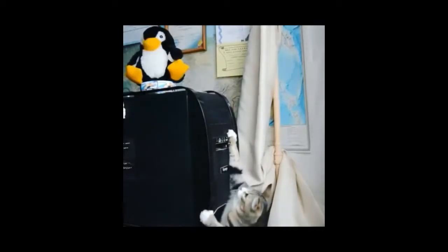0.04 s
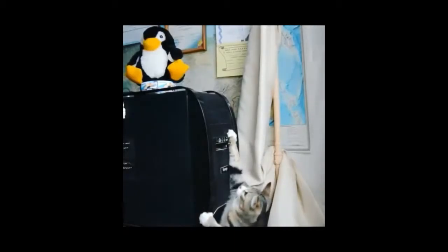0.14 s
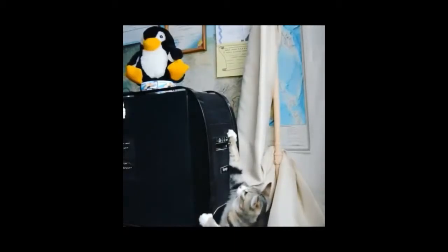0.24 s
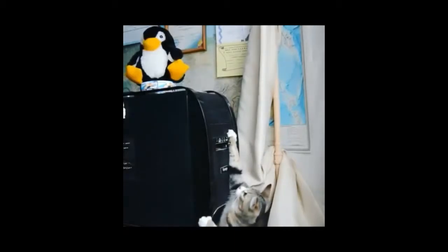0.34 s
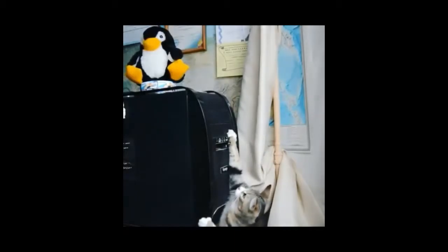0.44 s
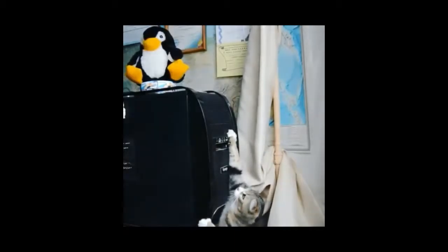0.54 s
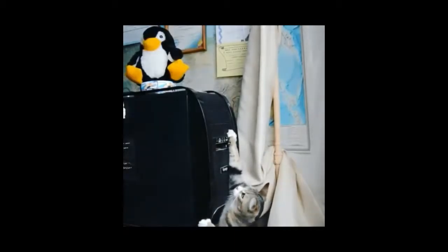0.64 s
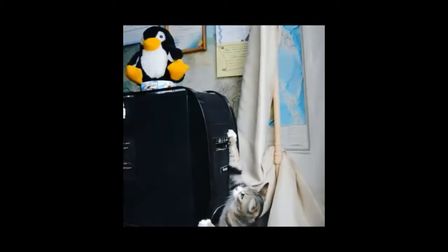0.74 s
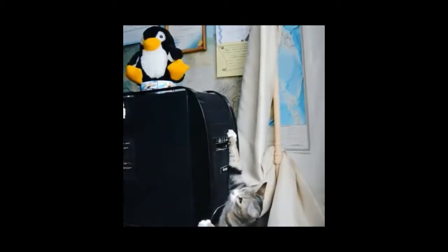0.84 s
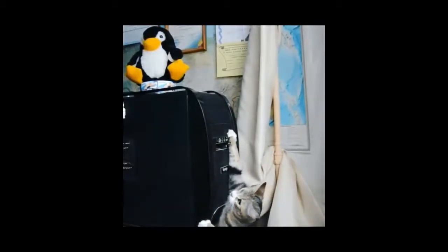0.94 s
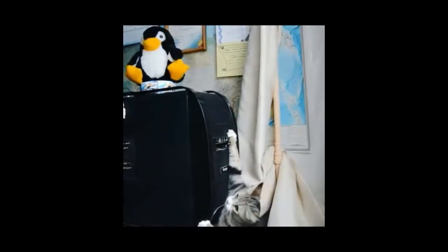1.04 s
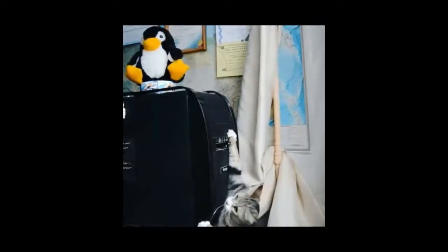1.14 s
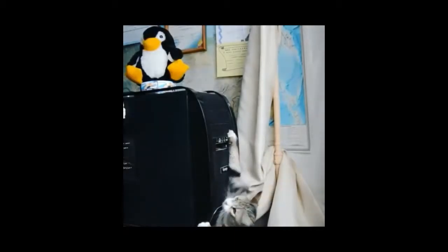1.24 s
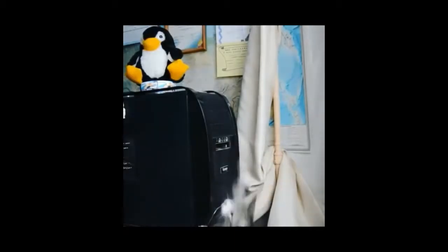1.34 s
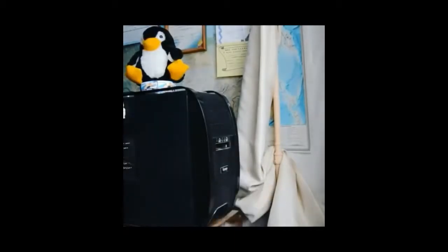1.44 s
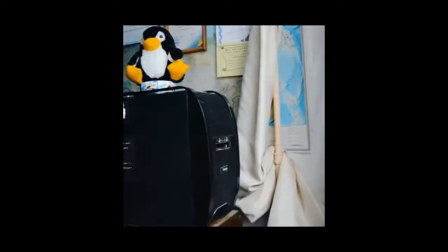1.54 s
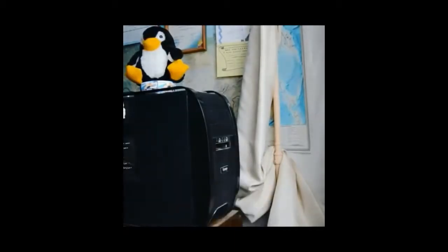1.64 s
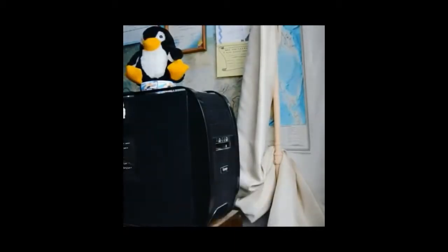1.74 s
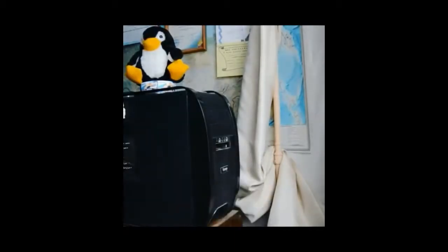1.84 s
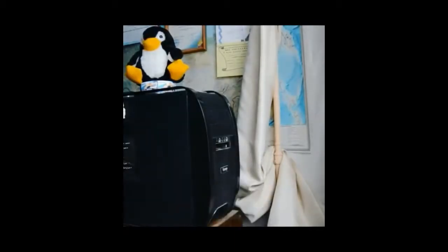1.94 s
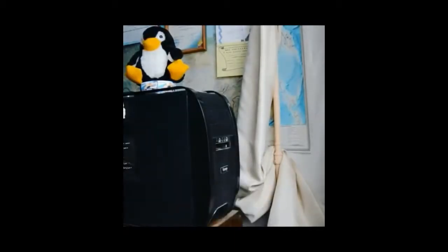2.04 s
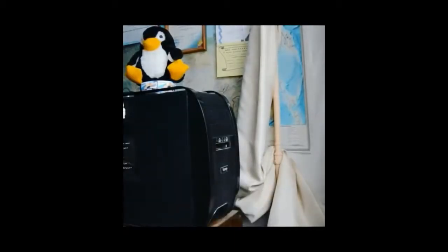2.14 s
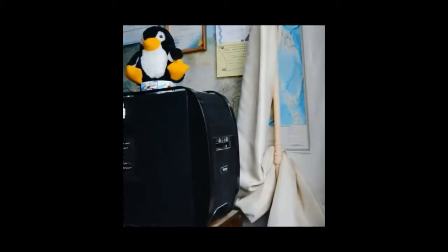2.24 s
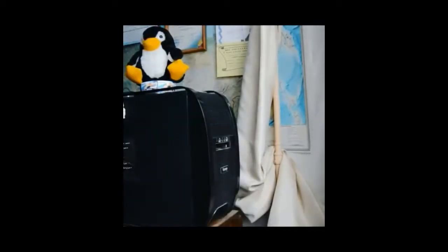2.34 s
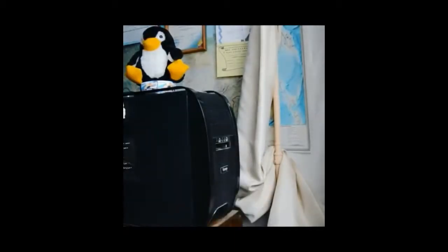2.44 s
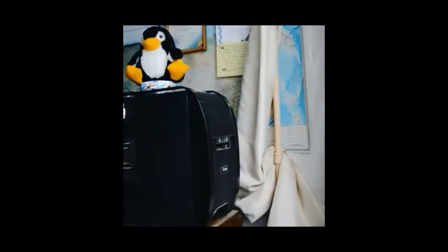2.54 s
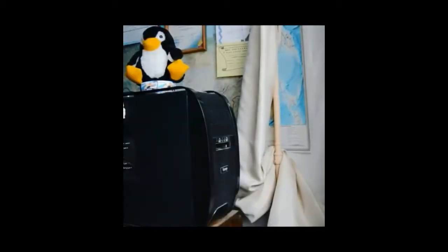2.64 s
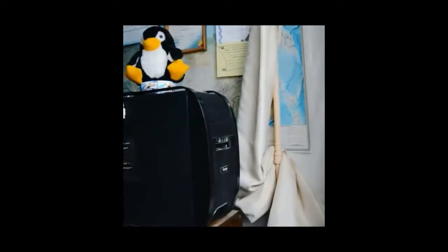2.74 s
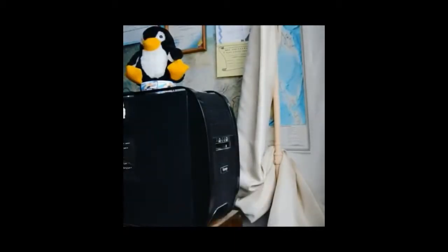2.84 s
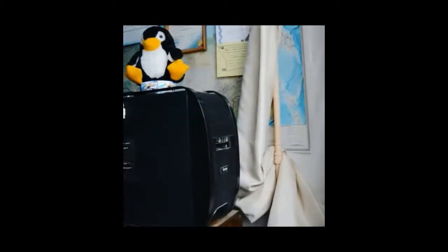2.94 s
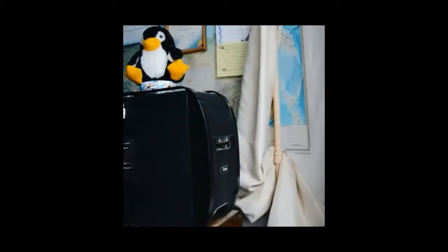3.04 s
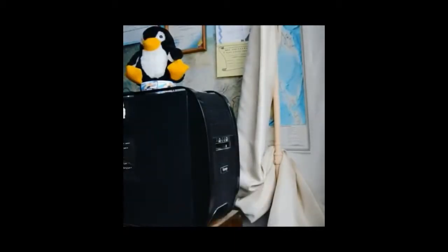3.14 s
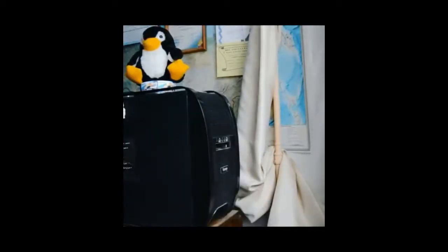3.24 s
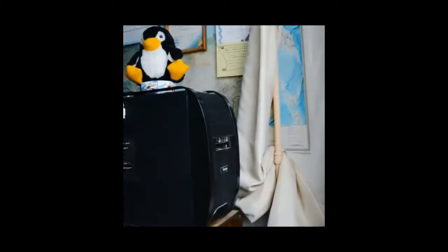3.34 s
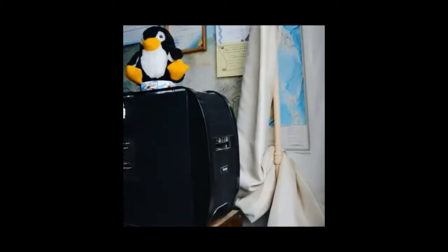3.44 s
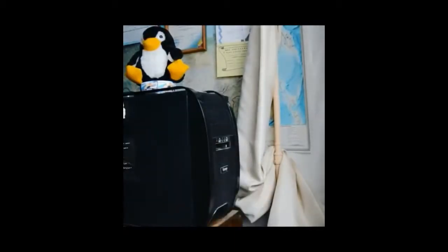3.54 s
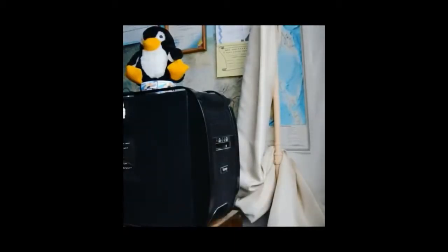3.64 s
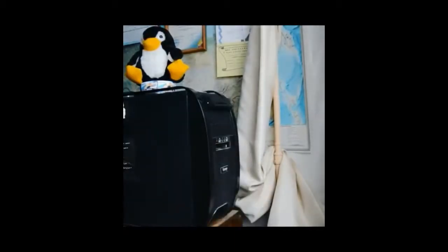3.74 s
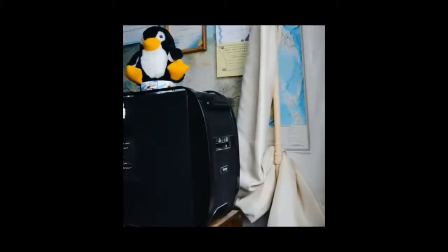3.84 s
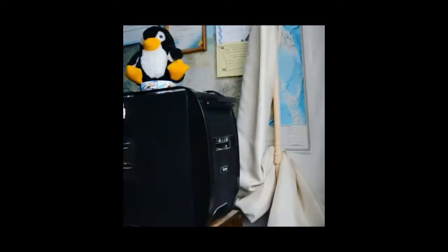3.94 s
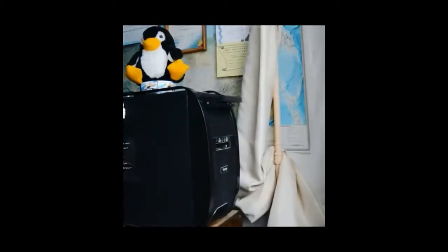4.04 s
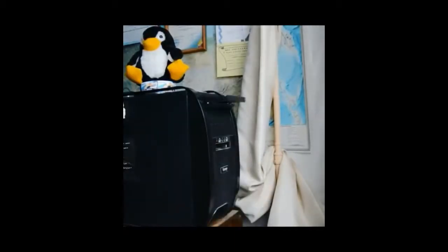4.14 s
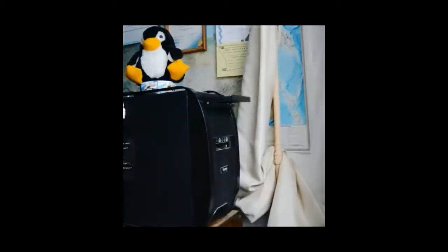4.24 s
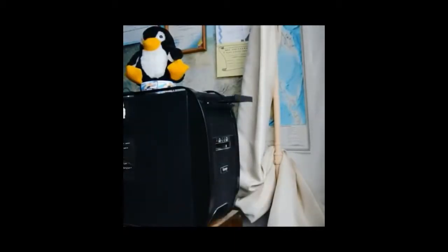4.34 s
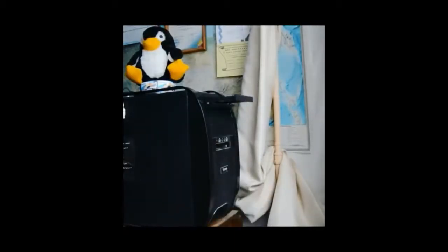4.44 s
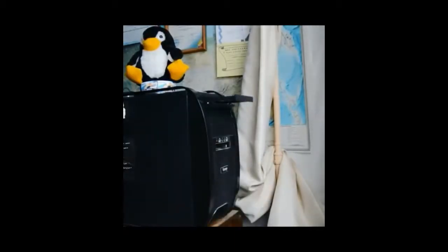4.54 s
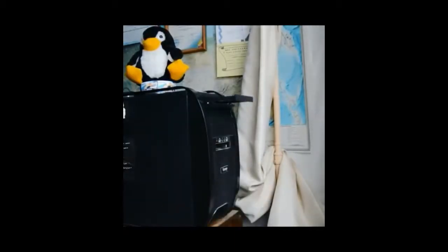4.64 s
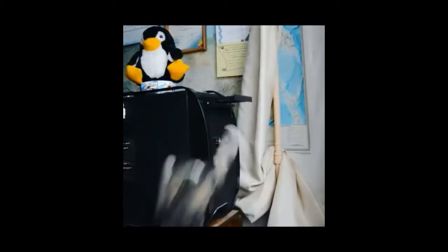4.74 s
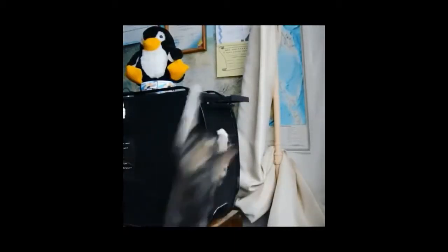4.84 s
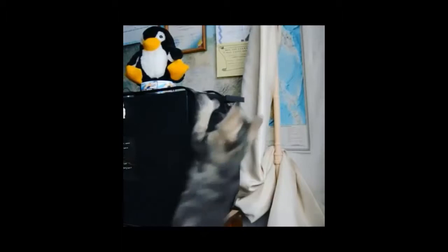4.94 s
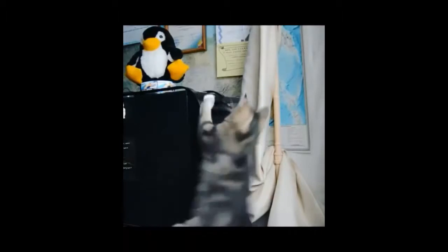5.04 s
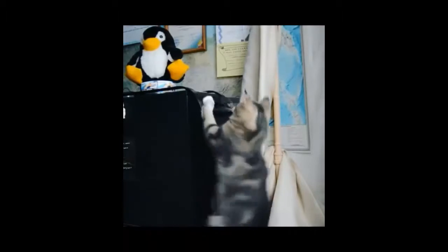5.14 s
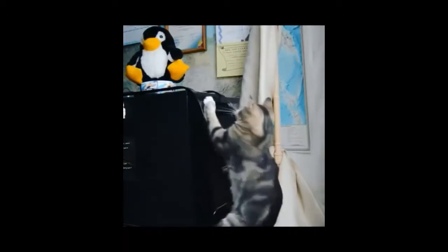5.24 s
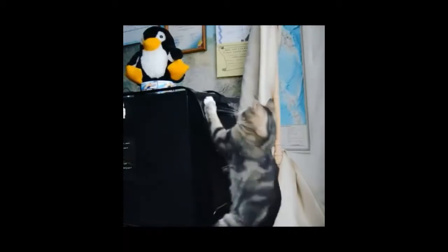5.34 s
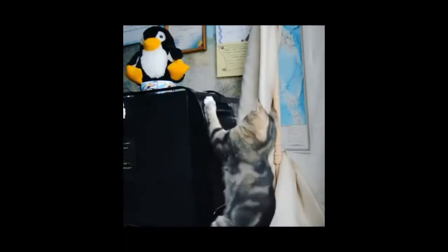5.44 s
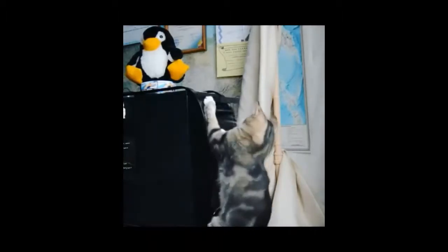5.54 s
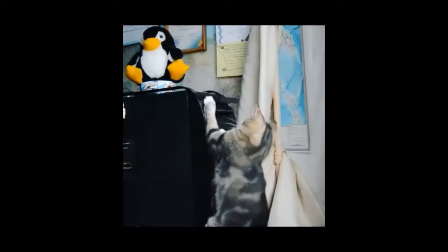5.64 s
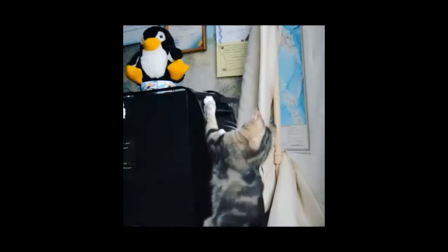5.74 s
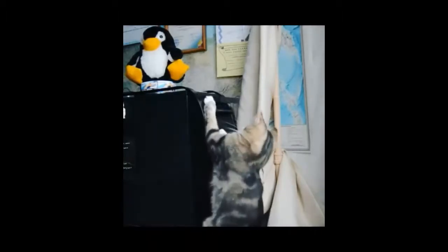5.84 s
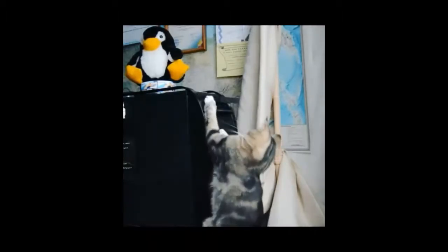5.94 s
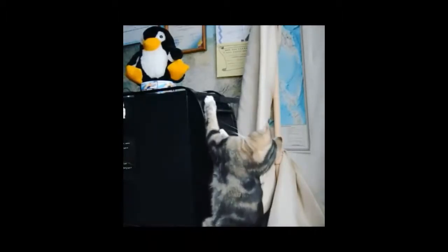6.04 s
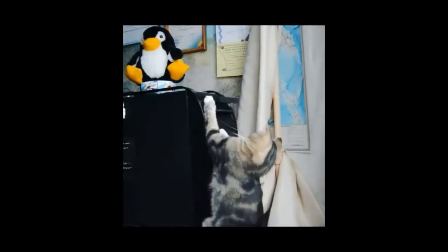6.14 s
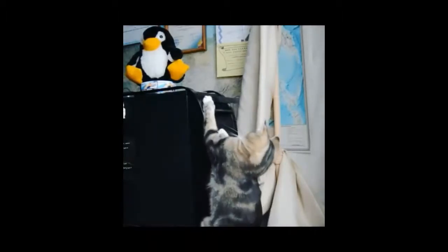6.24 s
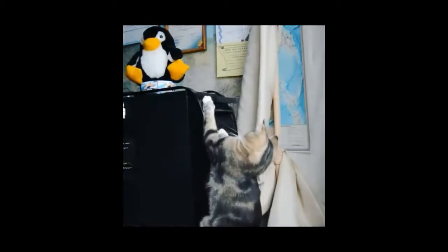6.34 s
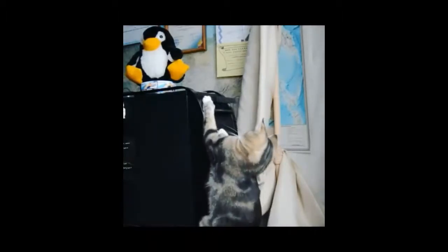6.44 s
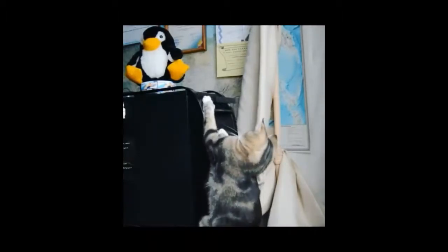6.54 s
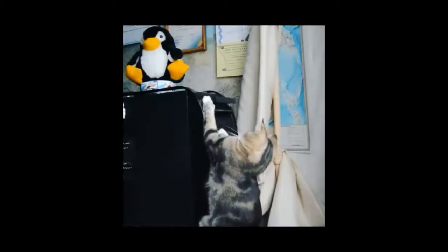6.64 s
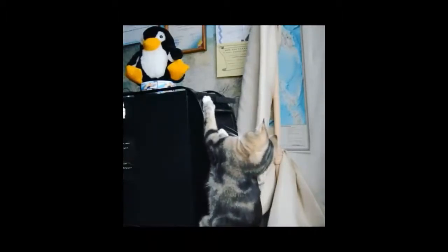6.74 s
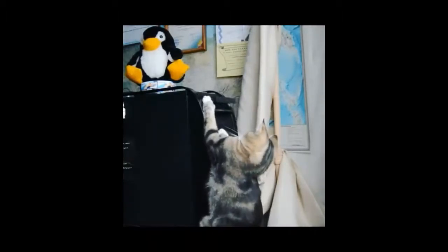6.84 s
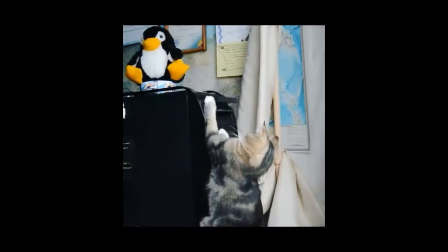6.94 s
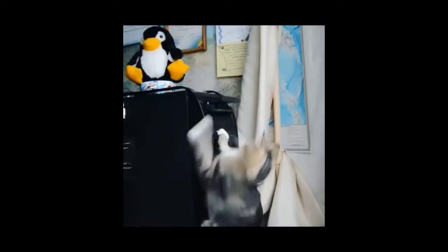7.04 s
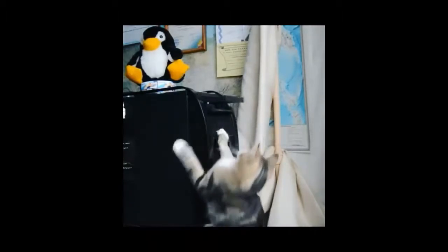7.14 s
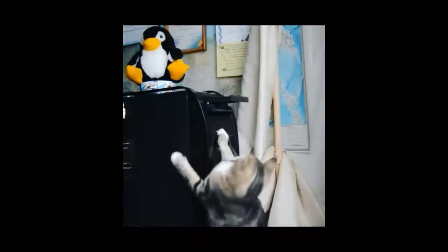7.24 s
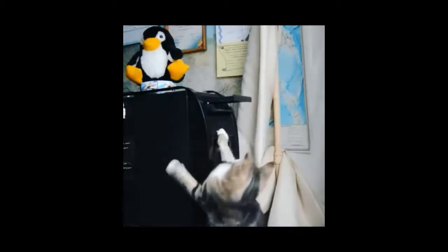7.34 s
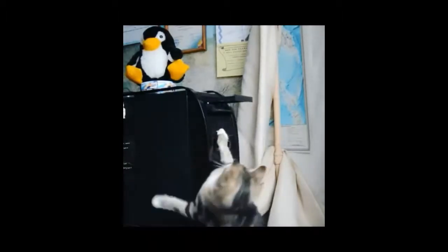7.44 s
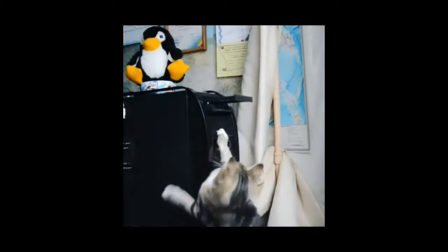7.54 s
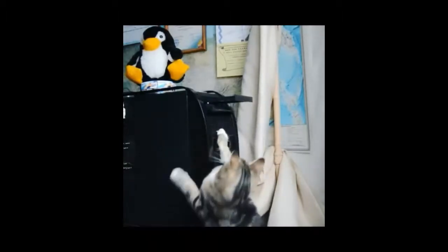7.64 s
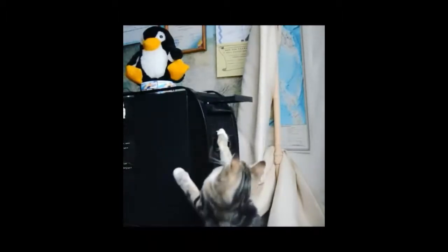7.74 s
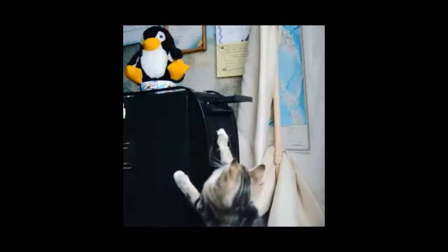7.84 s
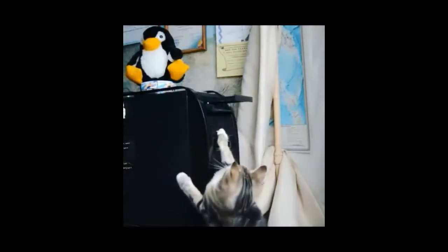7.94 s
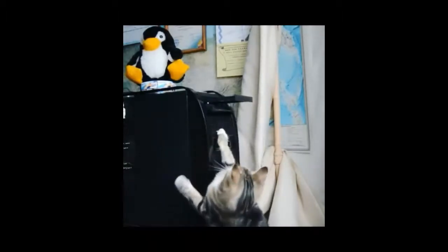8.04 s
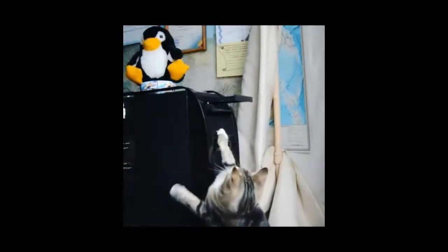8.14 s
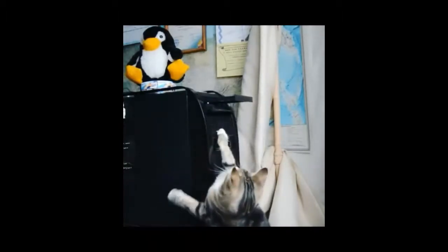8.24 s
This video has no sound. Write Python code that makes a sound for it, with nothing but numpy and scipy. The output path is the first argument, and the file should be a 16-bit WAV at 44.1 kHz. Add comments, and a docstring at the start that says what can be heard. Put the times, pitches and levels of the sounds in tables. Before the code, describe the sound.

A small microphone sits close to a computer case in a small furnished room; quiet fan air and faint wavering tones continue throughout. Soft brushing opens the scene, with one clear paw knock at 0.6 s. From 1.2 to 1.7 s the cat lets go and drops: quick clacks, scratchy rubs, the sharpest knock near 1.4, and a low thump near 1.6 bending upward, with the desk humming briefly. Boomy soft bumps follow at 2.2-2.6, then brushing and modest knocks at 3.4-4.0. Around 4.1-4.3 a faint, fuzzy tray-motor whine swells, sags in pitch and stops. The leap at 4.8-5.3 is loudest: hard claw strikes, scraping and hollow clatter, strongest at 4.9 and 5.2. A solid thud lands at 6.0, with soft bumps around it. Light knocks and a rub come at 7.1, then faint taps over the fans until about 8.3.

```python
"""In a small furnished room, a cat paws and claws at a computer case and leaps at the disc tray as it slides out.
Fans hum quietly throughout: filtered noise plus narrow-band tones. Fur, pads and tray brush along the case
as dense stick-slip clicks; paws and claws strike it as short bursts of slips that excite its modes.
Heavy landings leave two desk modes beating, the cat's weight thumps with a rising pitch,
and the tray's motor is narrow-band noise that swells, sags in pitch and fades."""
import sys
import numpy as np
from scipy import signal
from scipy.io import wavfile
from scipy.ndimage import uniform_filter1d

SR = 44100
rng = np.random.default_rng(int(sys.argv[2]) if len(sys.argv) > 2 else 0)


def materialize(psi):
    """Save the field psi as 16-bit PCM at rate SR to the path in sys.argv[1].

    A 1-D psi becomes a single channel; in a 2-D psi each row is a channel.
    """
    bounded = np.clip(np.atleast_2d(psi).T, -1, 1)
    quanta = np.round(bounded * 32767).astype(np.int16)
    wavfile.write(sys.argv[1], SR, quanta)


N = 366030


def gain_of(db):
    """Level definition: amplitude ratio for a level in dB."""
    return 10 ** (np.asarray(db) / 20)


def evened(x):
    """Normalisation: scales a signal to unit root-mean-square."""
    return x / np.sqrt(np.mean(x ** 2) + 1e-20)


def read(points, hz):
    """Interpolation of a frequency table along a logarithmic frequency axis."""
    f, value = np.transpose(points)
    return np.interp(np.log(hz + 1), np.log(f + 1), value)


def add(mix, s, sound):
    """Superposition: adds a sound to the mix from time s, cut at the end."""
    part = mix[round(s * SR):][:len(sound)]
    part += sound[:len(part)]


def resonate(x, hz, width):
    """Heterodyne resonance of gain 1: shifts the curve hz down to zero, smooths, and shifts back."""
    turn = np.exp(2j * np.pi * np.cumsum(hz * np.ones(len(x))) / SR)
    r = np.exp(-np.pi * width / SR)
    smoothed = signal.lfilter([1 - r], [1, -r], x / turn + 1e-18)
    return 2 * (turn * smoothed).real


def coloured(x, points):
    """Minimum-phase filtering: a causal filter with the gain of an (f/Hz, level/dB) table."""
    level_db = read(points, abs(np.fft.fftfreq(8192, 1 / SR)))
    log_gain = np.log(gain_of(level_db))
    response = np.exp(np.conj(signal.hilbert(log_gain)))
    taps = np.fft.ifft(response).real[:4096]
    return signal.oaconvolve(x, taps)[:len(x)]


# fan air noise, relative spectrum as heard through the microphone: (f/Hz, level/dB per Hz)
FAN_AIR = [(15, -47.5), (25, -26.5), (49, -5), (109, -21.5), (146, -4), (231, -15.5), (271, 2), (394, -16),
           (438, -3.5), (573, -7), (1000, -4), (1120, -7), (1350, -9), (2500, -14.5), (15000, -40)]
# fan tones, before the microphone: (f/Hz, bandwidth/Hz, level/dB)
FAN_TONES = [(146.1, 13, -79), (266, 12, -80.5), (969.98, 20., -79), (1042.9, 11, -82), (1357.8, 13, -78.5),
             (1764.4, 12., -81.5)]
FAN_AIR_DB = -65.5  # overall level before the microphone


def fans():
    """Broadband flow noise with drifting patches, and narrow-band blade tones that waver."""
    frames, hz = N // 256 + 5, np.fft.rfftfreq(1024, 1 / SR)
    real, imaginary, patches = rng.standard_normal((frames, 513, 3)).T
    patches = uniform_filter1d(patches, 10, 0)  # smooth over frequency
    patches = evened(uniform_filter1d(patches, 12, 1))  # smooth over time
    # the microphone's colour is taken out here, as record() puts it in
    spectrum_db = read(FAN_AIR, hz) - read(MICROPHONE, hz)
    z = (real + 1j * imaginary) * gain_of(spectrum_db[:, None] + 1.9 * patches)
    air = signal.istft(z, nperseg=1024, noverlap=768)[1][:N]
    tones = sum(gain_of(db) * evened(resonate(rng.standard_normal(N), f, width))
                for f, width, db in FAN_TONES)
    return gain_of(FAN_AIR_DB) * evened(air) + tones


def slips(count, per_s, spread_db):
    """Stick-slip friction: random clicks of uneven size and random sign."""
    size = gain_of(spread_db * np.minimum(rng.exponential(1, count), 4))
    sign = rng.choice([-1., 1.], count)
    return size * sign * (rng.random(count) < per_s / SR)


# countless small modes and the room, decay times before contact damping: (f/Hz, t60/s)
DENSE_DECAY = [(80, .5), (210, .4), (560, 0.65), (1470, 0.29), (3880, 0.23), (10200, .19)]


def rattle(force, damping, spot_db, direct_db):
    """Statistical energy balance: bands of small modes store and lose the energy fed in; bare ticks on top."""
    f, frame_s, z = signal.stft(rng.standard_normal(len(force)), SR, nperseg=256, noverlap=192)
    frame_starts = 64 * np.arange(len(frame_s))
    fed = np.add.reduceat(np.pad(force, (0, 256)) ** 2, frame_starts)  # energy per frame
    age = frame_s[:280]
    t60 = damping * read(DENSE_DECAY, f)[:, None]
    dying = gain_of(-120 * age / t60)  # a power, hence 120 in place of 60
    dying = dying * (1 + 4.3 * np.exp(-age / 0.0016))  # stronger at the onset
    power = abs(signal.oaconvolve(fed[None], dying, axes=1)[:, :len(frame_s)])
    spot = evened(uniform_filter1d(rng.standard_normal(z.shape), size=24, axis=1))
    spot = gain_of(spot_db * spot)  # the favoured bands shift as the contact moves
    dense = signal.istft(z * spot * np.sqrt(power), SR, nperseg=256, noverlap=192)[1][:len(force)]
    return evened(dense) + gain_of(direct_db) * evened(force)


# strokes of fur, pads and the tray along the case, before the microphone:
# (t/s, swell/s, hold/s, time to die by 20 dB/s (sign ignored), level/dB,
#  weight level re rub/dB, rasp level re rub/dB)
STROKES = [(-.09, 0.18366, 0.0561, 0.2892, -59, -21, -2), (0.263, 0.01988, 0.039, 0.0523, -73.5, -17.5, -6),
           (0.379, 0.01027, 0.0904, -0.2038, -66, -16, -4),
           (0.962, 0.02309, 0.02715, 0.0867, -64.5, -26.5, -12),
           (1.248, 0.02358, 0.0962, -0.0783, -50, -14, -5.5), (1.418, 0.028, 0.00523, 0.0868, -38, -10, -6),
           (1.482, 0.09262, 0.00494, 0.1347, -40, -6.5, -4.5),
           (1.645, 0.03658, 0.00314, 0.2286, -54, -2.5, -7.5),
           (3.205, 0.02052, .005, 0.0081, -67, -19, -6.5), (3.404, 0.07749, .005, 0.2228, -44.5, -6, -7.5),
           (3.696, 0.05774, 0.00475, 0.3096, -51, -2.5, -8), (3.851, 0.04054, 0.0528, 0.125, -65, -2.5, -9),
           (4.069, 0.0956, 0.00585, 0.1469, -59.5, -13, -4),
           (4.349, 0.01364, 0.004444, -0.6356, -59.5, -8, -8),
           (4.833, 0.01397, 0.01332, -0.0897, -43, -3, -9), (4.987, 0.02274, 0.11178, 0.068, -45, 0, -11.5),
           (5.219, 0.0294, 0.005575, 0.0573, -37, -3, -1.5),
           (5.394, 0.01244, 0.00533, 0.3696, -55, -5, -5.5),
           (7.122, 0.05054, 0.00504, 0.2498, -47.5, -11, -7),
           (7.313, 0.0306, 0.0369, 0.026, -68.5, 1.5, -8.5),
           (7.405, 0.01205, 0.0055, -0.2195, -60.5, -4, -9.5), (7.959, 0.079, .005, -0.23, -70, -20, -10.5),
           (8.169, 0.0368, 0.005213, 0.0181, -64.5, -20.5, -12)]
SWELL_POWER = 1.3


def rubs():
    """Friction excitation: clumped slips shake the case; weight raises the low panel, rasp the treble."""
    clumps = evened(uniform_filter1d(rng.standard_normal(N), size=700))
    force = slips(N, per_s=3300.0, spread_db=3.) * gain_of(1.2 * clumps)
    body = rattle(force, 0.25, spot_db=5.0, direct_db=-8.5)
    low = coloured(body, [(60, -12.5), (200, -2), (600, 3.5), (1200, -20.5), (4000, -49.5)])
    middle = coloured(body, [(300, -34.5), (900, 3.5), (2500, 1.5), (6000, -13.5), (16000, -42.0)])
    high = coloured(body, [(1500, -27.5), (4500, 21.5), (16000, 7.0)])
    layers = np.array([evened(x) for x in (middle, low, high)])
    gains = np.zeros((N, 3))
    t = np.arange(N) / SR
    for start, swell, hold, dying, db, weight_db, rasp_db in STROKES:
        since = t[max(round(start * SR), 0):][:SR * 2 // 3] - start
        press = np.clip(since / swell, 0, 1) ** SWELL_POWER
        press = press * gain_of(-20 * np.maximum(since - swell - hold, 0) / abs(dying))
        layer_gains = gain_of(db + np.array([0, weight_db, rasp_db]))
        add(gains, max(start, 0), press[:, None] * layer_gains)
    return (layers * gains.T).sum(0)


# clear modes of the case, before random weighting, detuning and damping: (f/Hz, level/dB, t60/s)
CASE_MODES = [(112.58, 5, 0.35), (85, -6, 1), (167.16, -0.5, 0.38), (205.68, -2.5, 0.8), (235.56, 0, 0.33),
              (321, -6, 0.16), (415.52, -3.5, 0.57), (281.35, 6.5, 0.28), (377.81, 0, .38),
              (455.49, -5, .3), (638.32, 2.5, 0.12), (664.45, 2, .17), (782.1, 2.5, 0.23), (894.49, 3, .22),
              (954.73, -3, .2), (1093.8, -1, 0.35), (1163, -9, 0.32), (1374.1, 6, 0.13),
              (1560.4, -2., 0.13), (1718.8, 0.5, 0.18), (1940, -8.5, 0.54), (2100, -7, 0.2),
              (2178.4, -1., 0.25), (2365.6, -5.5, .18), (2538.5, -9.5, 0.4), (2729.3, -1, 0.22),
              (3211.8, 0, 0.21), (3912.6, 0.5, .15), (4624, -16.5, .15)]


def ring(force, damping, spot_db):
    """Modal superposition: the clear case modes swell while the force feeds them, then die away."""
    t = np.arange(len(force)) / SR
    hz, db, t60 = np.transpose(CASE_MODES)[:, :, None]
    weight, detune = rng.standard_normal((2, *hz.shape))
    hz = hz * (1 + 0.0093 * detune)  # a paw resting on the panel bends the tuning a little
    phase = 2 * np.pi * (hz * t + rng.random(hz.shape))
    envelope = gain_of(db + spot_db * weight - 60 * t / (t60 * damping))
    modes = (envelope * np.sin(phase)).sum(0)
    return evened(modes * np.sqrt(np.cumsum(force ** 2)))


# blows of paw and claw, before the microphone; the four trims are nominal, re knock:
# (t/s, knock level/dB, side panel boom/dB, thud/dB, clack/dB, claw edge/dB,
#  skid time constant/s, share of the free ring time left by the paw, f of the spot struck/Hz)
BLOWS = [(0.5674, -35, -51, -14, -2.5, -14, 0.00785, 0.7037, 1557),
         (1.0118, -60, -37, -24, 10, -8.5, 0.02348, 0.6847, 3637),
         (1.1608, -50.5, -31.5, -19.5, 12, -6.5, 0.00523, 0.6872, 3145),
         (1.246, -50, -37, -36.5, -11, 2, 0.0255, 0.888, 1173),
         (1.2981, -45, -39.5, -18.5, 4.5, -2, 0.00785, 0.812, 1985),
         (1.3547, -38, -47, -13, -4.5, -9, 0.03194, 0.7185, 1420),
         (1.3702, -29, -38.5, -14, 0.5, -2.5, 0.013355, 0.3335, 1639),
         (1.3882, -22.5, -39.5, -21, -1, -2, 0.010995, .7, 1601),
         (1.4533, -40, -33, -14.5, -10.5, -11, 0.02097, 0.57, 557),
         (1.587, -43, -28.5, -8, -5.5, -4.5, .014, 0.3338, 598.6),
         (1.6036, -27.5, -34, -14, -3.5, -9, 0.01913, 0.6369, 1121),
         (1.6807, -37, -25, -14.5, -12, -37.5, .0058, 0.6105, 950),
         (2.175, -38.5, -18.5, -8, -19, -30.5, 0.02865, 0.353, 1083),
         (2.2543, -53.5, -10.5, -17.5, -5.5, -21.5, 0.004633, .8, 1249),
         (2.4158, -65, 2.5057, 13.5, -16.5, -20.5, 0.0091, .54, 828.5),
         (2.5691, -55, -25.5, -36, -12, -29.5, 0.006087, 0.639, 1636),
         (3.108, -53.5, -30.5, -12.5, 11.5, 9.5, .0075, 0.8215, 4210),
         (3.3539, -59, -36.5, -15.5, -5, -29, 0.006935, 1, 658),
         (3.4223, -51.5, -41.5, -10.5, -7, -19, 0.0127, 0.987, 1600),
         (3.4558, -36, -63.5, -8.5, -44.5, -20, 0.01009, 1, 848.9),
         (3.5187, -38, -29, -31.5, -6, -10, 0.008795, 0.8045, 3154),
         (3.7087, -52, -37, -1.5, 1.5, -10, 0.01648, 1, 1381),
         (3.7415, -46.5, -39, -11, -8.5, -18, 0.00899, 1, 1403),
         (3.9627, -56.5, -31, -14.5, -9.5, -8.5, 0.0135, 1, 1510),
         (4.3645, -53.5, -46, -26, 0.0376, -12.5, .0098, 0.906, 1344),
         (4.7773, -49, -26, -4.5, -12.5, -21.5, .011, 1, 1046),
         (4.8315, -32.5, -20.5, -14, -2, -8, 0.007615, 0.5516, 1070),
         (4.906, -16, -37, -31, -4, -7, 0.006056, .6, 2350),
         (4.9927, -27, -32.5, -16.5, 2, 1.5, 0.025858, 0.7209, 2697),
         (5.141, -32.5, -19, -12, 1.5, 0.5, 0.01022, 0.9685, 3153),
         (5.1945, -19.5, -41.5, -13.5, -2.5, -28.5, 0.008554, 0.6864, 1878),
         (5.2078, -26, -11, -8, -1.5, -1.5, 0.01806, 0.3634, 925),
         (5.2769, -29.5, -15.5, -14, -8.5, -11, 0.023112, 0.5468, 1326),
         (5.4143, -46.5, -19.5, -31, -20, 0, 0.007758, 1, 1092),
         (5.6795, -60, -7.5, -12.5, 8.5, -3.5, 0.005607, 0.4315, 2776),
         (5.846, -54, -21, -19, -17.5, -26, 0.00829, 0.9973, 1120),
         (5.925, -55, -11, -12.5, 4, -19.5, 0.0112, 0.851, 1648),
         (5.9776, -27, -17, -11.5, -9, -26.5, 0.008293, 0.8418, 974.2),
         (6.0814, -47, -6.5, -3.16, -14.5, -27.5, 0.0132, 0.665, 650.5),
         (6.547, -44, -31, -23.5, 1.3737, -7, 0.01056, 0.826, 1833),
         (7.0467, -55, -33, -14, -1.5, -8, 0.02784, 0.9973, 1923),
         (7.0879, -41.5, -40, -17, -8, -11, 0.00787, 1, 1410),
         (7.0969, -37, -47, -47.5, -1.5, -16, 0.0137, 0.9516, 1348),
         (7.1203, -38.5, -44.5, -11.5, -0.5, -12, 0.00618, 1, 746.4),
         (7.421, -52, -35, -27, -5.5, -11.5, 0.0099, 0.987, 1650),
         (7.491, -63.5, -24, -19, 11.5, 2.3034, 0.008575, 0.82, 1580),
         (7.9865, -65, -36, -19.5, 12, -14, 0.00654, 0.8, 2180),
         (8.039, -64, -15, -11.5, 6, -7, 0.008655, 0.9657, 2646),
         (8.1888, -65, -17.5, -5, 13.5, -11.5, 0.0098, 0.992, 2578)]
RISE_S, MIDDLE_HZ = .0016, 1524.7
# low spots and heavy thuds wake the hollow front
HOLLOW_DB, HOLLOW_DB_PER_OCTAVE, HOLLOW_PER_THUD = -0.5, -5, .4


def blow(s, db, boom_db, thud_db, clack_db, edge_db, skid, damping, spot_hz):
    """Impact with sliding: a paw or claw lands and a swelling, dying run of slips excites the case."""
    t = np.arange(SR * 2 // 5) / SR
    octaves = np.log2(spot_hz / MIDDLE_HZ)
    hollow_db = HOLLOW_DB + HOLLOW_DB_PER_OCTAVE * octaves + HOLLOW_PER_THUD * thud_db
    envelope = (1 - np.exp(-t / RISE_S)) * np.exp(-t / skid)
    force = slips(len(t), per_s=4000., spread_db=2.5) * envelope
    force[0] += 2.2  # the landing starts with one clean tick
    dense = rattle(force, damping, spot_db=4.0, direct_db=-5.5)
    # few small modes lie low: the clear ones lead there
    dense = dense - .6 * signal.lfilter(*signal.butter(1, 700., fs=SR), dense)
    sound = dense + gain_of(-6.0) * ring(force, damping, spot_db=1.5345)
    sound = sound + resonate(sound, spot_hz, 0.077 * spot_hz)  # the spot struck sings out
    touch = [(40, boom_db - 3.5), (110, boom_db + 12.5), (240, thud_db + 5.5), (600, hollow_db),
             (1400, 0.022), (3000, clack_db), (6500, edge_db - 4.5), (16000, edge_db - 8.0)]
    sound = coloured(sound, touch)
    # the level is set by the strongest short-time power in the knock band
    band = signal.butter(2, [900, 2000], "band", fs=SR, output="sos")
    knock = signal.sosfilt(band, sound[:2500])
    return s, gain_of(db) * sound / np.sqrt(2 * uniform_filter1d(knock ** 2, size=400).max())


# the desk board hums on after heavy landings, before rise and decay: (t/s, level/dB)
DESK_HUMS = [(1.396, -46.5), (1.585, -55), (1.689, -47), (1.806, -57), (3.456, -50.5), (3.731, -53),
             (5.206, -48.5), (5.978, -49)]
# the board's close pair of modes: (f/Hz, level re hum/dB, t60/s)
BOARD_MODES = [(267.09, -4.5, 0.88), (278.6, -3, 0.71)]


def desk(s, db):
    """Beating: two board modes close in frequency interfere slowly as they die."""
    t = np.arange(SR * 3 // 4) / SR
    pair = sum(gain_of(level_db - 60 * t / t60) * np.sin(2 * np.pi * (hz * t + rng.random()))
               for hz, level_db, t60 in BOARD_MODES)
    return s, gain_of(db) * pair * (1 - np.exp(-t / 0.0091))


# the cat's weight drops onto the desk, before rise and decay: (t/s, level/dB)
THUMPS = [(1.577, -37.5), (1.78, -56.5)]
THUMP_HZ, THUMP_BEND = 205.33, 0.25207  # final pitch; share by which it starts lower
THUMP_RISE_S, THUMP_T60_S = 0.00789, 0.4723


def thump(s, db):
    """Stiffening resonance: a soft low thump bends up in pitch as the padding squashes."""
    t = np.arange(SR // 4) / SR
    hz = THUMP_HZ * (1 - THUMP_BEND * np.exp(-t / 0.04138))
    tone = np.sin(2 * np.pi * np.cumsum(hz) / SR)
    tone = tone + 0.3653 * evened(resonate(rng.standard_normal(len(t)), hz, 90.))
    envelope = gain_of(db - 60 * t / THUMP_T60_S) * (1 - np.exp(-t / THUMP_RISE_S))
    return s, envelope * tone


TRAY_START_S, TRAY_PEAK_S = 4.09, 4.19
TRAY_DB, TRAY_SWELL_DB_PER_S, TRAY_FADE_DB_PER_S = -58.5, 88.5, 371.5  # whine level at the peak; slopes
TRAY_HZ, TRAY_SAG_HZ_PER_S = 1702.5, 1800
TRAY_TOP_HZ, TRAY_TOP_DB = 9155, -18  # thin top, level re whine


def tray():
    """Narrow-band noise: the tray motor's fuzzy whine swells, then sags and fades, under a thin steady top."""
    t = np.arange(SR // 4) / SR
    late = t - (TRAY_PEAK_S - TRAY_START_S)
    hz = TRAY_HZ - TRAY_SAG_HZ_PER_S * np.clip(late, 0, .1)
    db = TRAY_DB + np.minimum(TRAY_SWELL_DB_PER_S * late, -TRAY_FADE_DB_PER_S * late)
    noise = rng.standard_normal(len(t))
    whine = evened(resonate(resonate(noise, hz, 180.0), hz, 330.0))
    top = evened(resonate(resonate(noise, TRAY_TOP_HZ, 300.), TRAY_TOP_HZ, 500.))
    motor = whine + gain_of(TRAY_TOP_DB) * top
    return TRAY_START_S, gain_of(db) * motor * signal.windows.tukey(len(t), .2)


def scene():
    """Linear superposition of all the sources into one channel."""
    mix = fans() + rubs()
    for row in BLOWS:
        add(mix, *blow(*row))
    for row in DESK_HUMS:
        add(mix, *desk(*row))
    for row in THUMPS:
        add(mix, *thump(*row))
    add(mix, *tray())
    return mix[None]


# response of a small microphone with a notched treble: (f/Hz, level/dB)
MICROPHONE = [(30, -8.5), (90, -6.5), (250, -3), (3000, -4.5), (6500, -2.5), (7800, -6.5), (9200, -2),
              (10300, -9), (11600, -21), (13000, -13.5), (15500, -22)]
BAND_LIMIT_HZ = 16200


def record(dry):
    """Linear transduction: the microphone's response, then a low-pass band limit."""
    heard = coloured(dry[0], MICROPHONE)[None]
    low_pass = signal.firwin(255, BAND_LIMIT_HZ, window=("kaiser", 9), fs=SR)
    return signal.oaconvolve(heard, low_pass[None], "same")


dry = scene()
out = record(dry)
materialize(out)
```